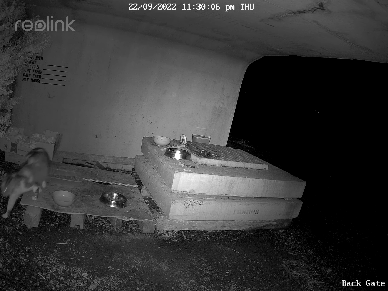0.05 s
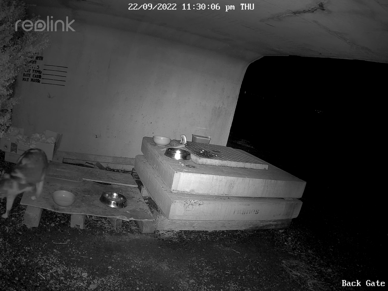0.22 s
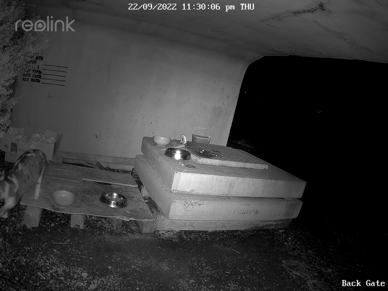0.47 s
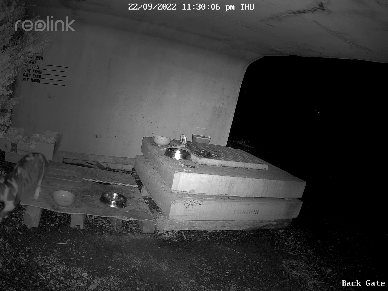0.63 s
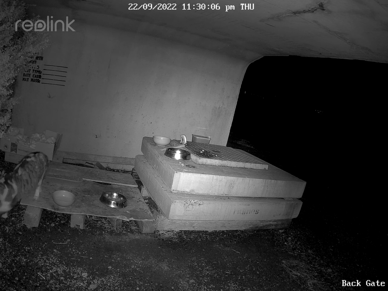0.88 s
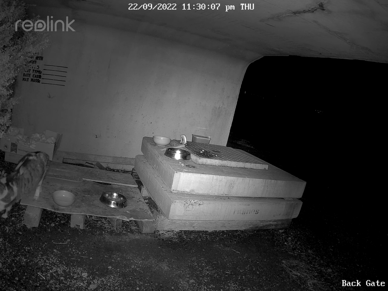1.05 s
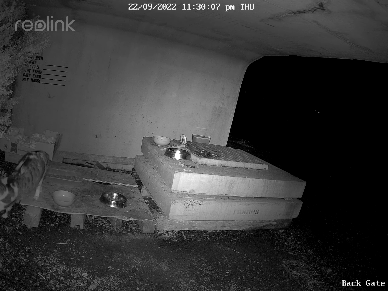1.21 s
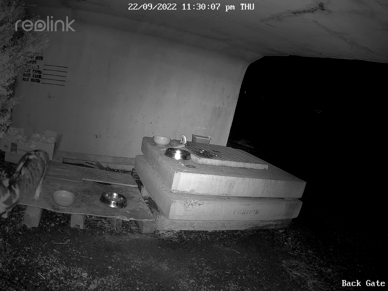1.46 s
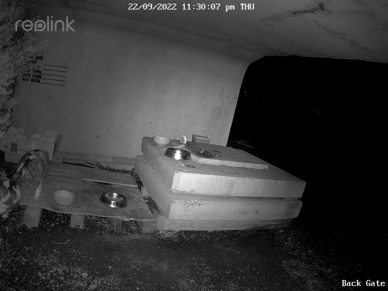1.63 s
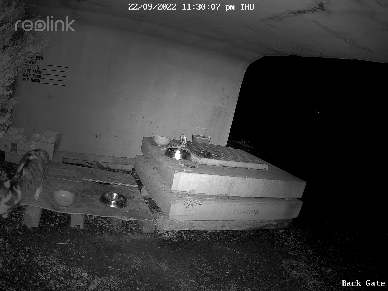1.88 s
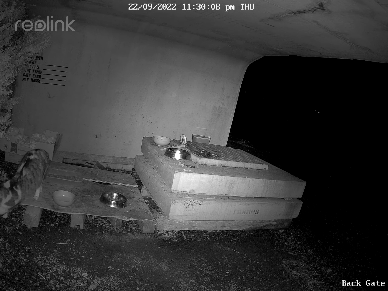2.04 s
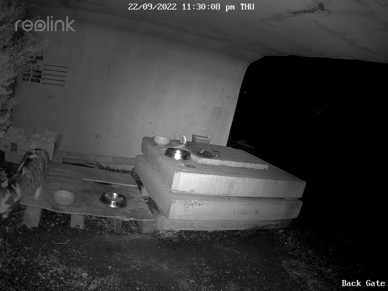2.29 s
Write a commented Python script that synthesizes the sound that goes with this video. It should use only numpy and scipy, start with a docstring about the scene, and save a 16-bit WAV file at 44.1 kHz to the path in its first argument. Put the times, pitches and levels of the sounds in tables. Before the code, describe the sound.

Light wind rumbling on a microphone at night, with faint hiss, distant hum and insect ticks.

```python
"""Night in a sheltered yard, on the microphone of a small fixed security camera. From the start, light
wind rumbles on the microphone and hisses, moans and whistles faintly round the edges, over a distant
machine hum and the camera's own noise. An insect ticks high and evenly, twelve times a second. A gust
buffets the microphone near 0.8 s, with one small click in it and a brief rustle just after. A second
gust hits near 1.8 s, and three fainter rustles follow."""
import sys
import numpy as np
from scipy import signal
from scipy.fft import rfft, irfft
from scipy.io import wavfile

SR = 44100
rng = np.random.default_rng(int(sys.argv[2]) if len(sys.argv) > 2 else 0)


def master(y):
    """Save y as 16-bit WAV."""
    cut = np.clip(np.atleast_2d(y).T, -1, 1)
    pcm = np.round(cut * 32767)  # scale
    wavfile.write(sys.argv[1], SR, pcm.astype(np.int16))


N = 105840

# wind on the microphone: t/s, level/dB
WIND_LEVEL = [(0, -61.5), (.12, -62.5), (.42, -52.5), (.56, -53.5), (0.659, -56), (.72, -43), (.8, -47.5),
              (0.938, -42), (1.019, -57), (1.1, -60.5), (1.451, -52), (1.729, -53), (1.791, -39.5),
              (1.879, -47), (1.96, -47), (2.06, -50), (2.159, -53), (2.4, -61.5)]
# its spectrum: f/Hz, relative level/dB
WIND_COLOUR = [(6, 10), (25, 1.5), (60, -2), (95, -6), (150, -21.5), (220, -42.5), (330, -44), (600, -67)]
# low-mid flutter, mostly in the first gust: t/s, level/dB
FLUTTER_LEVEL = [(0, -86.5), (0.279, -81), (.38, -75), (.55, -77.5), (.66, -80), (.77, -59), (.83, -71.5),
                 (0.931, -66), (1.05, -77), (1.349, -83), (1.6, -84), (2.4, -79.5)]
# its spectrum: f/Hz, relative level/dB
FLUTTER_SPECTRUM = [(60, -19), (130, 1.5), (200, 1), (290, -12.5), (400, -26.5), (800, -29)]
# single buffets on the diaphragm: t/s, f/Hz, half length/s, level/dB
EDDIES = [(.24, 25, 0.032, -44.5), (.355, 35, 0.015, -44.5), (.715, 52.6, 0.0086, -30),
          (.769, 99.7, 0.0052, -32.5), (0.876, 59.2, 0.02, -37), (1.779, 54.9, 0.02, -39.5),
          (1.832, 65.9, .013, -35.5), (2.039, 68.6, 0.038, -44.5)]
# outdoor hiss: t/s, level/dB
HISS_LEVEL = [(0, -79), (.2, -79.5), (.35, -77.5), (.42, -74), (.55, -74), (.7, -75), (.83, -67.5),
              (0.901, -71), (0.934, -72), (.97, -71.5), (1.25, -74.5), (1.43, -75), (1.721, -76.5),
              (1.9, -73.5), (2.06, -72.5), (2.4, -75.5)]
# its spectrum: f/Hz, relative level/dB
HISS_SPECTRUM = [(250, -8), (540, -19), (760, -11), (1000, -13), (1350, -12.5), (1700, -4), (2100, -6.5),
                 (2500, -14.5), (3050, -11.5), (3500, -21), (4100, -29.5), (7500, -37)]
# the wind's low moan: t/s, f/Hz, level/dB
EDGE_MOAN = [(0, 592.4, -110), (.33, 610, -86.5), (0.649, 632.7, -94), (0.801, 630, -75), (.87, 700, -82),
             (.94, 745, -79), (1.032, 786.3, -89), (1.15, 884, -87.5), (1.7, 807, -96.5),
             (2.0, 802.6, -88.5), (2.4, 767, -94.5)]
# the wind's thin whistle: t/s, f/Hz, level/dB
EDGE_WHISTLE = [(0, 1880, -87.5), (.35, 1890, -86), (0.441, 1910, -72.5), (.53, 1940, -83.5),
                (0.759, 2080, -81), (.83, 1950, -73), (.9, 1900, -81), (1.252, 1900, -85),
                (1.43, 1920, -78), (1.72, 1900, -91.5), (2.05, 2000, -83), (2.4, 1960, -84.5)]
# distant machine tones, before their swell: f/Hz, level/dB
MACHINE_TONES = [(117, -67.5), (139, -70), (225, -83)]
# their swell and fade: t/s, relative level/dB
MACHINE_SWELL = [(0, -6), (.25, -13.5), (.45, -1), (0.649, -3), (0.801, 9.5), (1.021, 7), (1.2, -1.5),
                 (1.4, -2), (1.65, -13), (1.85, -1.5), (2.099, -9), (2.4, -2.5)]
# the camera's own noise: f/Hz, relative level/dB
CAMERA_COLOUR = [(200, 8.5), (1000, 2), (4000, -4.5), (7200, -1.5), (7900, -7.5), (8600, -21.5)]
# the insect's tick peaks: t/s, level/dB
INSECT_LEVEL = [(0, -95), (.22, -91), (.31, -85.5), (.7, -86.5), (.88, -80.5), (1.299, -84.5), (1.88, -86),
                (1.979, -83), (2.4, -84.5)]
# rustle peaks: t/s, level/dB
RUSTLE_PEAKS = [(0.933, -62.5), (1.872, -74.5), (2.039, -71.5), (2.283, -70.5)]


def undb(db):
    """Decibels to gain."""
    return 10 ** (np.asarray(db) / 20)


def unit(x):
    """Scale to rms 1."""
    return x / np.sqrt(np.mean(x ** 2))


def fader(t, rows):
    """Gain along points of t/s, level/dB."""
    return undb(np.interp(t, *np.array(rows).T))


def noise(colour):
    """Noise of rms 1 shaped by points of f/Hz, level/dB, falling away above the last."""
    f = np.maximum(np.arange(N // 2 + 1) * SR / N, 1)
    hz, db = np.array(colour).T
    gain = undb(np.interp(np.log(f), np.log(hz), db)) / np.maximum(f / hz[-1], 1) ** 2
    return unit(irfft(rfft(rng.standard_normal(N)) * gain, N))


def ringing(hz, width_hz):
    """Noise of rms 1 in one steep resonance."""
    b, a = signal.iirpeak(hz, hz / width_hz / 2, fs=SR)
    return unit(signal.lfilter(b, a, signal.lfilter(b, a, rng.standard_normal(N))))


def wander(rate_hz):
    """Smooth random drift of rms 1, changing about rate_hz times a second."""
    f = np.arange(N // 2 + 1) * SR / N
    return unit(irfft(rfft(rng.standard_normal(N)) * np.exp(-(f / rate_hz) ** 2) * (f > 0), N))


def wind(t):
    """Turbulence right on the microphone: rumble, flutter and short eddies that rock the diaphragm."""
    rumble = noise(WIND_COLOUR) * fader(t, WIND_LEVEL)
    flutter = noise(FLUTTER_SPECTRUM) * fader(t, FLUTTER_LEVEL)
    buffets = push = 0
    for at, hz, half_s, db in EDDIES:
        age = t - at
        eddy = undb(db) * np.exp(-(age / half_s) ** 2)
        buffets -= eddy * np.sin(2 * np.pi * hz * age)
        push += eddy
    hardness = (push / push.max()) ** 2  # only the hardest buffets stir up grit
    grit = undb(-36.5) * push * hardness * ringing(306, width_hz=39)
    return rumble + flutter + buffets + grit


def hiss(t, flicker_db=.66, ring_flicker_db=3):
    """Outdoor hiss rings in the camera's housing; hiss and ring swell together but flicker separately."""
    broad = noise(HISS_SPECTRUM) * undb(flicker_db * wander(18))
    housing = ringing(1910, width_hz=180) * undb(-6 + ring_flicker_db * wander(24))
    return (broad + housing) * fader(t, HISS_LEVEL)


def edge_tone(t, rows, width_hz):
    """Air shedding eddies at an edge: an unsteady tone whose pitch moves with the flow."""
    at, hz, db = np.array(rows).T
    phase = 2 * np.pi * np.cumsum(np.interp(t, at, hz)) / SR
    tone = unit(wander(width_hz) * np.cos(phase) + wander(width_hz) * np.sin(phase))
    return undb(np.interp(t, at, db)) * tone


def machine_hum(t, waver_db=1, pitch_drift=.0045):
    """A machine far off: a deep drone and higher tones that swell, all wavering on their way."""
    def tone(hz, db):
        gain = undb(db + waver_db * wander(4.6))
        phase = 2 * np.pi * hz * np.cumsum(1 + pitch_drift * wander(6.7)) / SR
        return gain * unit(np.sin(phase))
    drone = tone(hz=65.07, db=-62.5)
    return drone + fader(t, MACHINE_SWELL) * sum(tone(hz, db) for hz, db in MACHINE_TONES)


def electronics(t, whine_hz=5905):
    """The camera's own steady noise floor and faint whine."""
    floor = undb(-86.5) * noise(CAMERA_COLOUR)
    whine = undb(-112) * unit(np.sin(2 * np.pi * whine_hz * t))
    return floor + whine


def insect(t, first_s=.058, period_s=.08318, half_s=.0044, top_hz=7190, arch_hz=90.9, scatter_db=.87):
    """An insect in the yard: evenly spaced, slightly raspy ticks, each a short arch in pitch."""
    tick = np.round((t - first_s) / period_s).astype(int)
    offset = (t - first_s - tick * period_s) / half_s  # from the tick's centre, in half lengths
    strength = undb(scatter_db * rng.standard_normal(tick.max() + 2))[tick]
    envelope = strength / (1 + offset ** 2) ** .98
    hz = top_hz - arch_hz * np.minimum(offset ** 2, 2)
    tone = np.sin(2 * np.pi * np.cumsum(hz) / SR)
    rasp = .35 * ringing(top_hz, width_hz=240)
    return (tone + rasp) * envelope * fader(t, INSECT_LEVEL)


def click(t, at_s=.7941, rise_s=.00007, decay_s=.0012, knock_hz=463, knock_decay_s=.004):
    """One small click: a sudden step that dies away at once, with a brief hollow knock."""
    age = np.maximum(t - at_s, 0)
    step = undb(-46) * (np.exp(-age / decay_s) - np.exp(-age / rise_s))
    knock = undb(-61.5) * np.exp(-age / knock_decay_s) * np.sin(2 * np.pi * knock_hz * age)
    return -(step + knock)


def rustles(t, half_s=.011):
    """Short, soft swells of noise that ring near the whistle's pitch."""
    swell = sum(undb(db) * np.exp(-((t - at) / half_s) ** 2) for at, db in RUSTLE_PEAKS)
    return swell * ringing(1930, width_hz=69)


def scene():
    """The yard in mono, from the one fixed microphone."""
    t = np.arange(N) / SR
    air = wind(t) + hiss(t)
    edges = edge_tone(t, EDGE_MOAN, width_hz=40) + edge_tone(t, EDGE_WHISTLE, width_hz=38)
    return (air + edges + machine_hum(t) + electronics(t) + insect(t) + click(t) + rustles(t))[None]


def record(dry):
    """The camera cuts the top steeply above 8.5 kHz."""
    lowpass = signal.ellip(8, .1, 60, 8500, fs=SR, output="sos")
    return signal.sosfiltfilt(lowpass, dry)


dry = scene()
out = record(dry)
master(out)
```